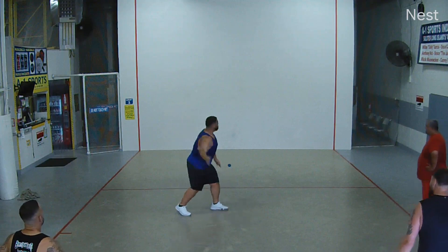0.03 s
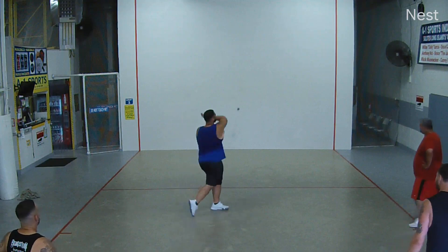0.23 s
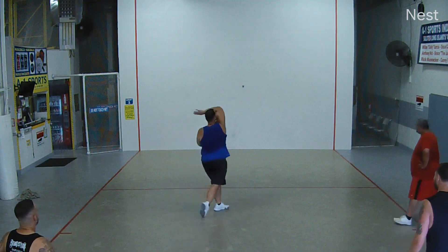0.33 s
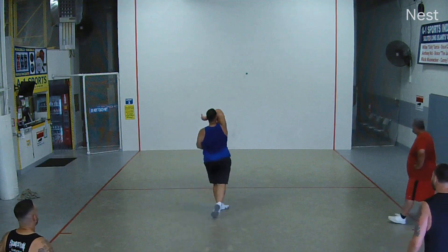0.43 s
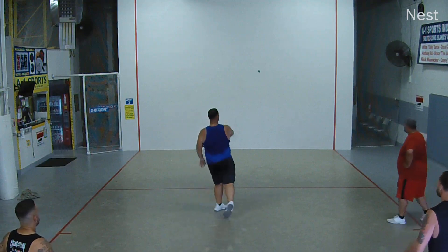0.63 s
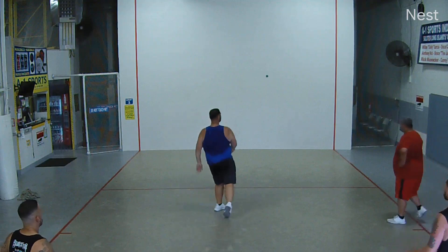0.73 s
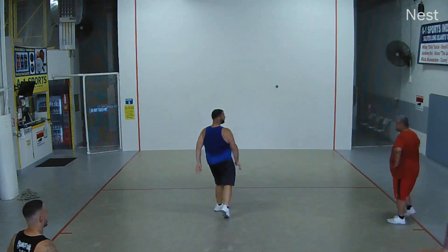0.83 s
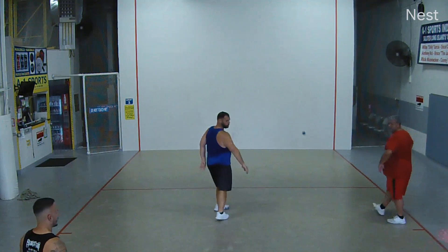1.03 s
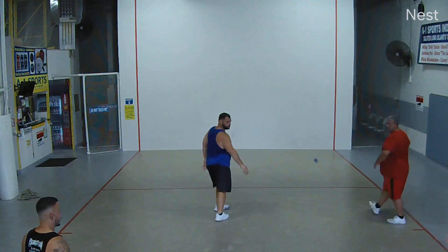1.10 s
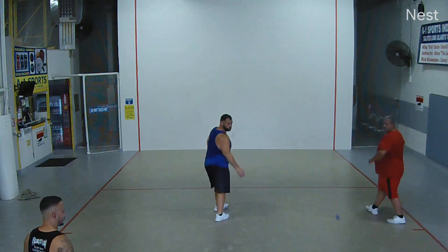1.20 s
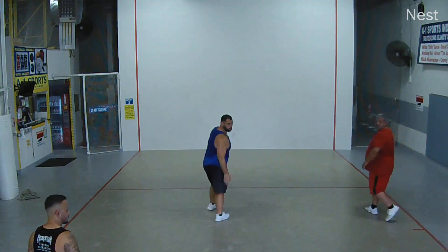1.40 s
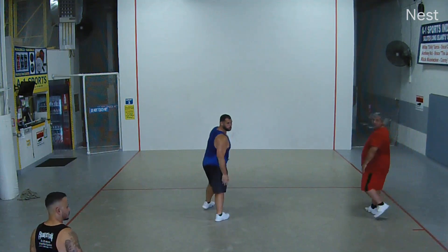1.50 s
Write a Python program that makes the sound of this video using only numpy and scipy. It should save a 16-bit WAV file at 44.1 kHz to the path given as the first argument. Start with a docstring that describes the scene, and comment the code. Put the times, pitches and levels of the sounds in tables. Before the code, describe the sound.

A hand smacks a rubber ball, which pops off a wall in an echoing indoor court.

```python
"""A steady rush of fans, then an open hand smacks a hollow rubber ball, which rings briefly:
a handball serve in a hard-walled indoor court. A third of a second later the ball pops on the front wall.
Walls and ceiling throw both hits back, then the hall rings on. Soles scuff and squeak, the ball
bounces faintly and a step lands, all heard from behind the players through a small microphone."""
import sys
import numpy as np
from scipy import signal
from scipy.fft import rfft, irfft
from scipy.io import wavfile

SR = 44100
rng = np.random.default_rng(int(sys.argv[2]) if len(sys.argv) > 2 else 0)


def put_to_file(sound):
    """Save the sound as 16-bit audio at rate SR, in the file named by the first command-line argument."""
    columns = np.atleast_2d(sound).T  # one column per channel
    safe = np.clip(columns, -1, 1)
    whole_steps = np.round(safe * 32767)
    wavfile.write(sys.argv[1], SR, whole_steps.astype(np.int16))


N = 68355


def amp(db):
    """Decibels to gain."""
    return 10 ** (np.asarray(db) / 20)


def unit(x):
    """Scales a sound to energy 1."""
    return x / np.sqrt(np.sum(x ** 2) + 1e-20)


def curve_at(points, hz):
    """Reads a curve on a log-frequency axis."""
    freq_hz, value = np.transpose(points)
    return np.interp(np.log(hz + 1), np.log(freq_hz + 1), value)


def cut(x, hz, side, order):
    """High-pass or low-pass filter."""
    return signal.sosfilt(signal.butter(order, hz, side, fs=SR, output="sos"), x)


def add(mix, start_s, sound):
    """Mixes a sound in at its cue."""
    part = mix[round(start_s * SR):][:len(sound)]
    part += sound[:len(part)]


def in_court(start_s, gain_db, sound, space):
    """Plays a sound at its cue through the court's impulse response."""
    out = np.zeros(N)
    add(out, start_s, amp(gain_db) * signal.fftconvolve(sound, space))
    return out


def click(spectrum, size=4096):
    """A contact click with the given tone; minimum phase packs its energy into the attack."""
    log_gain = np.log(amp(curve_at(spectrum, abs(np.fft.fftfreq(size, 1 / SR)))))
    minimum_phase = np.exp(np.conj(signal.hilbert(log_gain)))
    return unit(np.fft.ifft(minimum_phase).real[:size // 2])


def ring(modes, size=2048):
    """A struck body rings as a few dying sines."""
    t = np.arange(size) / SR
    return unit(sum(amp(db) * unit(amp(-60 * t / t60_s) * np.sin(2 * np.pi * hz * t))
                    for hz, db, t60_s in modes))


def spatter(decay_s, spray_db, size=1024):
    """One impulse trailed by a quickly dying spray of small ones."""
    spray = rng.standard_normal(size) * np.exp(-np.arange(size) / SR / decay_s)
    return signal.unit_impulse(size) + amp(spray_db) * unit(spray)


# Tone of the fan bed: freq_hz, relative_db
FAN_SPECTRUM = [(65, -55), (110, -22.5), (301, -14), (371, -8), (544, -5), (594, 0), (1110, -4), (1470, 0),
                (2150, -3), (2340, -4.5), (7000, -33.5), (9100, -69), (15400, -120)]
def fans(level_db=-48.5):
    """Fans push air through the hall in a steady rush."""
    tone = amp(curve_at(FAN_SPECTRUM, np.fft.rfftfreq(N, 1 / SR)))
    rush = irfft(rfft(rng.standard_normal(N)) * tone, N)
    return amp(level_db) * np.sqrt(N) * unit(rush)


# Tone of the palm's crack: freq_hz, relative_db
PALM_SPECTRUM = [(200, -6.5), (300, 6), (420, -3), (560, 1), (750, -9.5), (1300, 6), (1900, -3),
                 (2300, -0.5), (3000, -5), (3800, -0.5), (4800, -6), (5700, -9), (7000, -7.5), (9000, -6)]
# Ring of the ball off the hand: pitch_hz, relative_db, t60_s
SERVE_MODES = [(977, 5.5, 0.031), (1673, -4.5, 0.056)]
# Paths from hand to microphone, direct one first: delay_s, gain_db, low_cut_hz, high_cut_hz
SERVE_PATHS = [(0, 1, 1580, 5960), (.0135, -2, 1390, 3000), (.0255, 1, 750, 5900), (.030, -9.5, 750, 6000),
               (.038, -0.5, 1380, 6200), (.051, -7, 587, 4950), (.0625, -8, 500, 5000),
               (.077, 4.5, 700, 1300), (.101, -4, 240, 5010), (.223, -6, 700, 1290)]
def hand_slap(start_s=0.2185):
    """The palm's crack fills the hall at once; the hollow ball's ring comes back in separate echoes."""
    fingers = spatter(decay_s=0.011, spray_db=8)  # the fingers close on the ball
    crack = unit(np.convolve(click(PALM_SPECTRUM), fingers))
    echoes = reflections(SERVE_PATHS, scatter_db=-7)
    crack_space = echoes + far_echo() + amp(10.5) * hall(build_s=0.0088)
    ring_space = echoes + amp(4.5) * hall(build_s=0.012)
    slap = in_court(start_s, -8, crack, crack_space)
    slap += in_court(start_s, -4.5, ring(SERVE_MODES), ring_space)
    return cut(slap, 213, "high", order=14)


def reflections(paths, scatter_db):
    """The direct hit and its echoes off walls and ceiling, each smeared and coloured by its path."""
    out = np.zeros(N)
    for delay_s, gain_db, low_cut_hz, high_cut_hz in paths:
        arrival = unit(spatter(decay_s=0.0042, spray_db=scatter_db))
        arrival = cut(arrival, low_cut_hz, "high", order=2)
        add(out, delay_s, amp(gain_db) * cut(arrival, high_cut_hz, "low", order=2))
    return out


# Typical reverb time across the hall's spectrum: freq_hz, t60_s
HALL_DECAY = [(150, 0.59), (350, 0.99), (700, 2.06), (1300, 2.13), (2700, 1.91), (4500, 1.52), (7000, 0.99)]
def hall(build_s, spread=0.17, size=2048):
    """Dense reflections swell into a tail; uneven damping lets some room tones outlast others."""
    hz, t, tones = signal.stft(rng.choice([-1., 1.], N), SR, nperseg=size)
    unevenness = np.exp(spread * np.clip(rng.standard_normal(len(hz)), -2, 2))
    t60_s = curve_at(HALL_DECAY, hz) * unevenness
    tail = signal.istft(tones * amp(-60 * t / t60_s[:, None]), SR, nperseg=size)[1][:N]
    swell = (1 - np.exp(-np.arange(N) / SR / build_s)) ** 2
    return unit(tail * swell)


def far_echo(delay_s=0.25, length_s=0.09):
    """The far end of the hall returns a hit late, as one smeared swell."""
    t = np.arange(0, length_s, 1 / SR)
    swell = rng.standard_normal(N)[:len(t)] * np.sin(np.pi * t / length_s)
    out = np.zeros(N)
    add(out, delay_s, amp(-6.5) * unit(swell))
    return cut(cut(out, 1020, "high", order=2), 4950, "low", order=4)


# Ring of the ball on concrete: pitch_hz, relative_db, t60_s
POP_MODES = [(812, -18.5, 0.019), (912, -4.5, 0.04), (1045, 5, 0.025), (1264, 4.5, 0.035),
             (1638, -1.5, 0.023), (1924, -6.5, 0.072), (2710, -8.5, 0.013)]
# Tone of the crack on concrete: freq_hz, relative_db
POP_SPECTRUM = [(80, -38.5), (125, -14), (170, -9), (330, 0), (470, -0.5), (620, 6), (1400, 9.5),
                (2400, 2.5), (3600, -7), (5000, -13.5), (5700, -10), (6700, -8), (7400, -43), (9000, -56.5)]
def ball_pop(contact_s=0.002115, release=0.4):
    """The ball flattens on concrete and springs off with a weaker, opposite pulse: a hollow pop."""
    press = ring(POP_MODES) + amp(1.5) * click(POP_SPECTRUM)
    pop = press.copy()
    add(pop, contact_s, -release * press)
    return unit(pop)


# Paths from front wall to microphone, direct one first: delay_s, gain_db, low_cut_hz, high_cut_hz
FRONT_WALL_PATHS = [(0, -10, 1500, 2500), (.008, 4.5, 1850, 2200), (.018, 1.5, 1500, 2200),
                    (.0225, 3.5, 500, 950), (.031, 1.5, 482, 1300), (.055, 1, 807, 1170),
                    (.068, -9.5, 713, 1500), (.083, -4, 400, 2200), (.092, -7.5, 895, 3200),
                    (.108, -4, 400, 1800), (.215, -10, 395, 2010)]
def wall_hit(start_s=0.554, gain_db=1.5):
    """The ball pops loudly on the front wall and the whole court answers."""
    echoes = reflections(FRONT_WALL_PATHS, scatter_db=-1.5)
    space = echoes + far_echo() + amp(6) * hall(build_s=0.0051)
    return in_court(start_s, gain_db, ball_pop(), space)


# Scuff cues: start_s, length_s, level_db
SOLE_SCUFFS = [(0.785, 0.04, -27.5), (1.118, 0.083, -41), (1.381, 0.032, -22)]
def scuffs():
    """Soles brush the floor as the players move, each a short hiss washed in reverb."""
    out = np.zeros(N)
    for start_s, length_s, level_db in SOLE_SCUFFS:
        t = np.arange(0, length_s, 1 / SR)
        rub = rng.standard_normal(N)[:len(t)] * np.sin(np.pi * t / length_s)
        rub = cut(cut(rub, 2150, "high", order=2), 5470, "low", order=1)
        out += in_court(start_s, level_db, unit(rub), hall(build_s=0.003))
    return out


# Squeak cues: start_s, length_s, pitch_hz, level_db
SOLE_SQUEAKS = [(.952, 0.044, 2100, -46.5), (1.07, 0.028, 1990, -43.5), (1.415, 0.018, 2770, -44)]
def squeaks(jitter_hz=170):
    """Rubber soles slip on the floor in tiny, rough chirps."""
    out = np.zeros(N)
    for start_s, length_s, pitch_hz, level_db in SOLE_SQUEAKS:
        t = np.arange(0, length_s, 1 / SR)
        slip = cut(rng.standard_normal(N), jitter_hz, "low", order=2)
        hz = pitch_hz + jitter_hz * slip[:len(t)] / slip.std()
        chirp = np.sin(2 * np.pi * np.cumsum(hz) / SR)
        add(out, start_s, amp(level_db) * np.sin(np.pi * t / length_s) * chirp)
    return out


def floor_bounce(start_s=1.1, gain_db=-19):
    """The ball glances lightly off the floor: a thin pop heard through its reverb."""
    thin_pop = cut(ball_pop(), 980, "high", order=3)
    return in_court(start_s, gain_db, thin_pop, amp(6.5) * hall(build_s=0.014))


# Tone of the landing sole: freq_hz, relative_db
SOLE_SPECTRUM = [(90, -28.5), (200, -11), (290, 8), (420, -7), (600, 6.5), (1000, 7.5), (2000, -13),
                 (3500, -2), (5000, -17), (7000, -30), (9000, -39)]
# Thud of the heel on the floor: pitch_hz, relative_db, t60_s
HEEL_MODES = [(273.6, 0, 0.044)]
def footstep(start_s=1.424):
    """A sole lands nearby and stirs the hall; its soft thud and tick stay dry."""
    step = in_court(start_s, -19.5, click(SOLE_SPECTRUM), amp(4.5) * hall(build_s=0.0016))
    tick = cut(spatter(decay_s=0.006, spray_db=6), 3500, "high", order=2)
    add(step, start_s, amp(-29.5) * ring(HEEL_MODES))
    add(step, start_s, amp(-31) * unit(tick))
    return step


def scene():
    """Ball, footwork and fan bed in one mono mix."""
    ball = hand_slap() + wall_hit() + floor_bounce()
    footwork = footstep() + squeaks() + scuffs()
    return (ball + footwork + fans())[None]


def record(dry, low_cut_hz=148, high_cut_hz=7080, band_limit_hz=8969):
    """A small microphone loses the bass and top treble; a steep band limit follows."""
    thin = cut(dry, low_cut_hz, "high", order=6)
    dull = signal.sosfilt(signal.cheby1(10, .5, high_cut_hz, fs=SR, output="sos"), thin)
    band_limit = signal.firwin(511, band_limit_hz, window=("kaiser", 9), fs=SR)
    return signal.oaconvolve(dull, band_limit[None], "same")


dry = scene()
out = record(dry)
put_to_file(out)
```